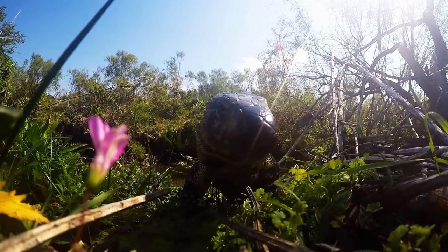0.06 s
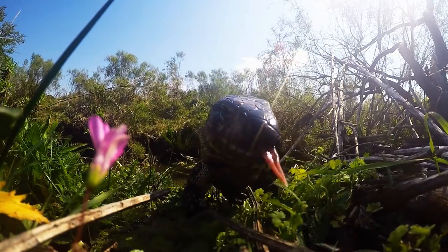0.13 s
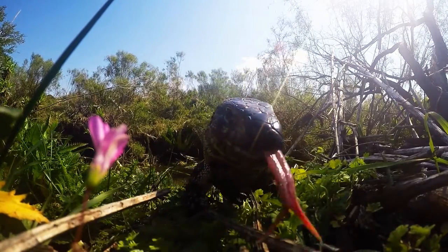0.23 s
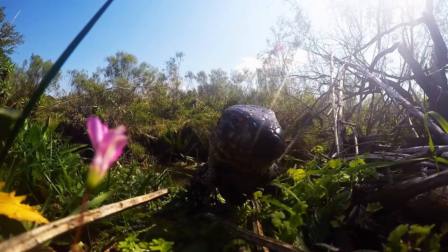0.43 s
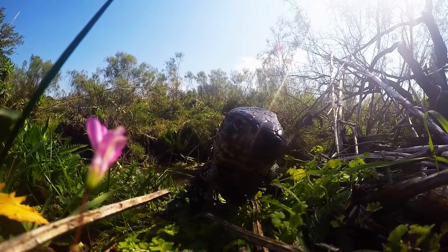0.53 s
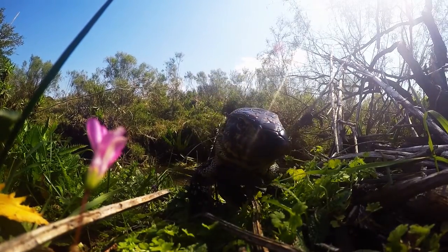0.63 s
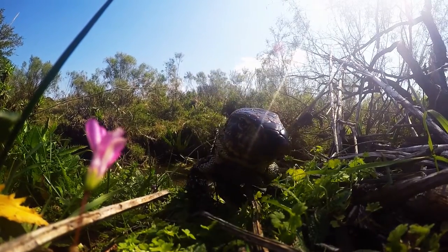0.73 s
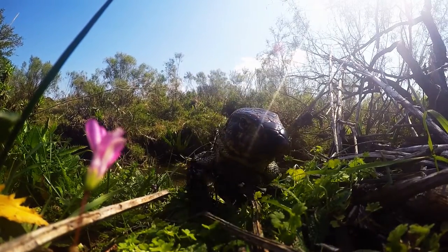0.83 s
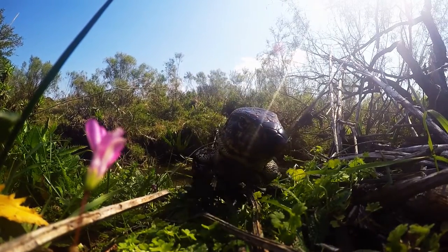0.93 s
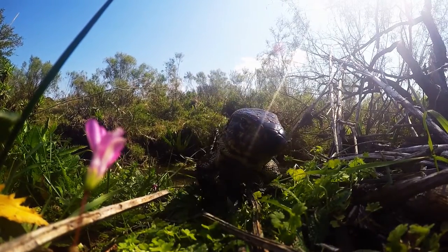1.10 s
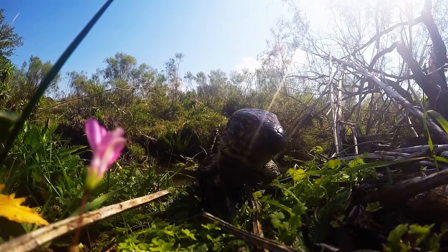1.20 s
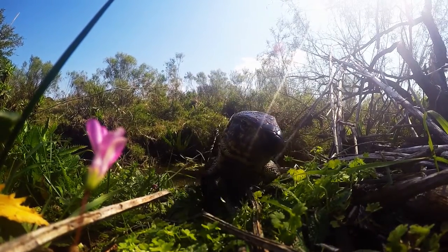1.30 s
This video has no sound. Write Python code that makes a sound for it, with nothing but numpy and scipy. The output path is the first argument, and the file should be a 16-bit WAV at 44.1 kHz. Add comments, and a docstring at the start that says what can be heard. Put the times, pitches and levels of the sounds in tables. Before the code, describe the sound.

Leaves rustle and stems tick as a lizard moves, with one sharp knock and low wind.

```python
"""Leaves rustle over a low rumble of wind and ground and a faint hiss of outdoor air.
A large lizard is shifting through low plants, right in front of a camera lying on the ground.
Dry blades scrape, feet thud softly, stems tick and ping, and one hard knock overloads the microphone.
The rustles, ticks and knock ring in the camera's case. Near the end, one distant bird whistles."""
import sys
import numpy as np
from scipy import signal
from scipy.fft import rfft, irfft, next_fast_len
from scipy.io import wavfile

SR = 44100
rng = np.random.default_rng(int(sys.argv[2]) if len(sys.argv) > 2 else 0)


def generate_wav(sig):
    """Save sig (samples, or channels by samples) to the path in sys.argv[1] as 16-bit PCM at SR."""
    pcm = np.round(np.clip(np.atleast_2d(sig).T, -1, 1) * 32767).astype(np.int16)
    wavfile.write(sys.argv[1], SR, pcm)


N = 59535  # 1.35 seconds


def amp(db):
    """Turn decibels into a gain."""
    return 10 ** (np.asarray(db) / 20)


def unit(x):
    """Scale x to an average (rms) level of 1."""
    return x / np.sqrt(np.mean(x ** 2) + 1e-20)


def along(points, hz):
    """Read between (Hz, value) points, with octaves evenly spaced."""
    pitches, values = np.transpose(points)
    return np.interp(np.log(hz + 1), np.log(pitches + 1), values)


def curves(rows):
    """Join timed rows into one curve for each column after the time."""
    times, *columns = np.transpose(rows)
    return [np.interp(np.arange(N) / SR, times, column) for column in columns]


def filtered(x, response):
    """Turn each frequency in x up or down by the gain response(hz)."""
    size = next_fast_len(N + SR // 2)
    return irfft(rfft(x, size) * response(np.fft.rfftfreq(size, 1 / SR)), size)[..., :N]


def noise(tone):
    """Noise of level 1, shaped by (Hz, dB) points."""
    return unit(filtered(rng.standard_normal(N + SR // 2), lambda hz: amp(along(tone, hz))))


def add(out, start, x):
    """Mix x into out from start, in seconds."""
    part = out[max(round(start * SR), 0):][:len(x)]
    part += x[:len(part)]


def friction(slips_per_s=700, smooth=0.9, spread_db=3.5):
    """Rubbing: tiny slips of uneven size over a smooth hiss."""
    slips = (rng.random(N) < slips_per_s / SR) * np.sign(rng.standard_normal(N))
    sizes = amp(spread_db * np.clip(rng.standard_normal(N), -2, 2))
    return unit(unit(slips * sizes) + smooth * rng.standard_normal(N))


def stroke(length, rise_s=0.0036, fall_s=0.0063):
    """The push of a brush or scrape: it rises, holds, then dies away."""
    t = np.arange(SR // 5) / SR
    return np.minimum(t / rise_s, 1) * np.exp(-np.maximum(t - length, 0) / fall_s)


# Where the case rings. Each row: pitch in Hz, width in Hz, level in dB.
CASE_RINGS = [(748, 129, -5.5), (969, 110, -3.5), (1130, 170, -2), (1511, 172, 2), (1713, 133, 7),
              (1907, 140, 3.5), (2278, 88, -4.5), (2767, 234, -6.5), (3267, 126, -3.5), (3560, 87.6, -6),
              (4392, 82, -3.5), (4404, 530, -10), (5710, 220, -12)]
# What gets through between those pitches. Each row: frequency in Hz, level in dB.
CASE_LEAK = [(60, -11), (600, -16.5), (2500, -14.5), (5000, -21.5), (7000, -24), (8000, -32), (9200, -37),
             (11000, -40), (12500, -35.5), (16000, -51.5)]
def case_ring(bass_db, treble_db, tone, size=4096):
    """The case rings after a touch: soft ones have more bass, dry ones more treble."""
    hz = np.fft.rfftfreq(size, 1 / SR)
    peaks = sum(amp(db) ** 2 / (1 + ((hz - pitch) / width) ** 2) ** 2 for pitch, width, db in CASE_RINGS)
    power = amp(along(CASE_LEAK, hz)) ** 2 + peaks
    balance = [(280, 0), (480, bass_db), (900, bass_db), (1450, 0), (2100, 0), (4500, treble_db)]
    colour = amp(along(tone, hz) + along(balance, hz))
    cepstrum = irfft(np.log(unit(np.sqrt(power)) * colour))
    # Fold it so that the ring comes after the touch, never before.
    cepstrum[1:size // 2] *= 2
    cepstrum[size // 2 + 1:] = 0
    return irfft(np.exp(rfft(cepstrum)))[:size // 2]


# The tone of the plants. Each row: frequency in Hz, boost in dB.
PLANT_TONE = [(300, 4), (1100, -0.5), (1750, -1), (2500, 1), (4400, -1.5), (9000, 1), (13000, -5),
              (16000, -5.5)]
# How much the plants stir. Each row: time in seconds, strength in dB.
STIR_LEVELS = [(0, -53.5), (.17, -52.5), (.45, -53), (.62, -54), (.8, -52.5), (.86, -63.5), (1.1, -70),
               (1.18, -58.5), (1.35, -59.5)]
def stirring_plants():
    """The plants keep rubbing, with slips so sparse that single crackles stand out."""
    stir_db, = curves(STIR_LEVELS)
    rubbing = amp(stir_db) * friction(slips_per_s=400, smooth=0.73)
    return signal.fftconvolve(rubbing, case_ring(bass_db=6, treble_db=2, tone=PLANT_TONE))[:N]


# The rumble's swells. Each row: time in seconds, strength of the deep and the upper band in dB.
RUMBLE_LEVELS = [(0.0, -45.5, -60), (0.036, -76, -31.5), (0.066, -38.5, -38.5), (0.172, -61, -42.5),
                 (0.258, -30, -30.5), (0.348, -36.5, -49), (0.442, -39.5, -38.5), (0.476, -20.5, -37),
                 (0.586, -39, -32.5), (0.646, -37, -44.5), (0.744, -28, -28), (0.792, -68, -32),
                 (0.818, -28.5, -66), (0.916, -42, -55), (1.224, -35.5, -46.5), (1.254, -27.5, -32),
                 (1.292, -39.5, -52), (1.35, -40, -42.5)]
# The tones of the two bands. Each row: frequency in Hz, boost in dB.
DEEP_TONE = [(10, -17.5), (24, 1), (42, 1), (60, -13.5), (90, -33.5), (300, -84.5), (1000, -120)]
UPPER_TONE = [(30, -3.5), (60, -1), (88, 1), (120, -6.5), (170, -12), (260, -21.5), (400, -27), (800, -37),
              (3000, -100)]
def rumble(trim_db=-2.5):
    """Wind and shaken ground rumble in two bands, mostly below and above 60 Hz."""
    deep_db, upper_db = curves(RUMBLE_LEVELS)
    return amp(deep_db + trim_db) * noise(DEEP_TONE) + amp(upper_db + trim_db) * noise(UPPER_TONE)


# The tone of the air. Each row: frequency in Hz, boost in dB.
AIR_TONE = [(80, 7.5), (200, 2), (450, -9.5), (650, -12.5), (900, 3), (1350, -16.5), (1850, -6),
            (2300, -12.5), (3500, -12), (7000, -19.5), (10000, -23.5), (15500, -25.5)]
def outdoor_air(db=-57):
    """The open air gives a faint, steady hiss."""
    return amp(db) * noise(AIR_TONE)


# Leaf strokes. Each row: start and length in seconds, then strength, bass and treble in dB.
LEAF_STROKES = [(0.017, 0.012, -42.5, 7, -4), (0.027, 0.023, -45, 4.5, -2), (0.063, 0.039, -39, -1, 1.5),
                (0.112, 0.026, -32.5, -11, 1.5), (0.138, 0.021, -49, -11, 3),
                (0.198, 0.024, -38.5, -2.5, 4), (0.235, 0.008, -32, 14, -3.5), (0.249, 0.022, -32, -2, 3.5),
                (0.274, 0.051, -40.5, 8, -0.5), (0.33, 0.066, -53, -8, 3.5), (0.417, 0.005, -34.5, 4, 9),
                (0.424, 0.051, -53, 10, 6.5), (0.719, 0.014, -38.5, 10, -2), (0.727, 0.033, -51, 17.5, -12),
                (0.793, 0.049, -56.5, 18.5, -28), (1.034, 0.017, -54, 10, 3),
                (1.122, 0.007, -58.5, 21, 9.5), (1.129, 0.011, -49, 13.5, 6.5),
                (1.148, 0.009, -38.5, -11, 0), (1.215, 0.061, -55.5, -30, 4)]
def brushing_leaves():
    """Leaves rub along the lizard's body, and the rubbing rings in the case."""
    out = np.zeros(N)
    for start, length, db, bass_db, treble_db in LEAF_STROKES:
        push = stroke(length)
        rubbing = push * friction()[:len(push)]
        add(out, start, amp(db) * signal.fftconvolve(rubbing, case_ring(bass_db, treble_db, PLANT_TONE)))
    return out


# Where a dry blade rings. Each row: pitch in Hz, width in Hz, level in dB.
BLADE_RINGS = [(4430, 110, 0), (6800, 350, -19)]
# Its scrapes. Each row: start in seconds, length in seconds, level in dB.
BLADE_SCRAPES = [(.017, 0.0076, -44), (0.029, 0.014, -45), (0.201, 0.013, -42.5)]
def scraping_blades():
    """Rubbing makes a dry blade ring with a thin squeak."""
    out = np.zeros(N)
    blade = lambda hz: sum(amp(db) / (1 + ((hz - pitch) / width) ** 2) for pitch, width, db in BLADE_RINGS)
    for start, length, db in BLADE_SCRAPES:
        push = stroke(length)
        squeak = unit(filtered(friction(), blade))[:len(push)]
        add(out, start, amp(db) * push * squeak)
    return out


# Footsteps. Each row: start in seconds, peak in dB, pitch in Hz, fade time in seconds.
FOOTSTEPS = [(0.035, -34.5, 131, 0.0051), (0.241, -33.5, 63.25, 0.16), (0.263, -23.5, 167.4, 0.0051),
             (0.42, -23.5, 55.6, 0.033), (0.558, -30.5, 72.2, 0.052), (0.668, -38, 307, 0.0037),
             (0.731, -28, 81.7, 0.04), (0.761, -25.5, 75, .022), (1.248, -36.5, 40.4, 0.036),
             (1.248, -29.5, 132, 0.0042)]
def footfalls(rise_s=0.0021):
    """Each step gives the soft ground a push, and it sways to rest."""
    out, t = np.zeros(N), np.arange(SR // 2) / SR
    for start, db, hz, fade in FOOTSTEPS:
        sway = (1 - np.exp(-t / rise_s)) * np.exp(-t / fade) * np.sin(2 * np.pi * hz * t)
        add(out, start, amp(db) * sway / np.abs(sway).max())
    return out


def contacts(rows, grit, tone, rise_s=0.00037):
    """A clean blow plus a short crunch, grit times as strong, rings the case."""
    out, t = np.zeros(N), np.arange(-SR // 500, SR // 20) / SR
    after = np.maximum(t, 0)
    window = 0.002 * SR  # a hit's level counts all its energy as falling within 2 ms
    for start, db, bass_db, treble_db, fade in rows:
        crunch = rng.standard_normal(len(t)) * (1 - np.exp(-after / rise_s)) * np.exp(-after / fade)
        spectrum = rfft(grit * crunch / np.linalg.norm(crunch) + (t == 0))
        force = irfft(spectrum / np.sqrt(np.abs(spectrum) + 1e-9))[:len(t) // 2]  # evens out the tone
        ring = case_ring(bass_db, treble_db, tone)
        hit = signal.fftconvolve(force, ring)
        gain = amp(db) * np.sqrt(window) * np.linalg.norm(ring)
        add(out, start + t[0], gain * hit / np.linalg.norm(hit))
    return out


# Ticks. Each row: start in seconds, then strength, bass and treble in dB, crunch fade in seconds.
STEM_TICKS = [(.0385, -27, 0, -17, 0.015), (.052, -36.5, 6, 5, 0.0025), (.075, -28, 8.5, 2.5, 0.0028),
              (.0975, -59, -12, 4, 0.0024), (.1232, -26.5, 0.5, 7.5, 0.0014), (.130, -32, -11, -5, 0.0015),
              (.2362, -28, 18, 7, 0.0004), (.252, -25.5, -10, -11, 0.0015), (.279, -34, 4, -14, 0.0015),
              (.291, -20, -8, -12.5, 0.0007), (.2983, -18, -10, -40, 0.0006), (.302, -20, -13, -27, 0.0028),
              (.311, -47, 12, 2, 0.0015), (.3175, -25.5, -7, -32, 0.0029), (.4195, -40.5, 15, 20, 0.0061),
              (.4835, -46.5, 13.5, 6.5, 0.0032), (.556, -27.5, -2.5, -3, 0.0011), (.571, -41, 0, 2, 0.0022),
              (.605, -55, 2, 21.5, 0.0045), (.625, -40, 11.5, -13, 0.00065),
              (.666, -26.5, -5, -1.5, 0.0023), (.709, -24.5, -7, 0, 0.002), (.764, -42.5, 4, 4, 0.0018),
              (.787, -51, 25, -10, 0.0012), (.796, -37.5, 8, -1, 0.002), (.809, -37.5, 16.5, -3.5, 0.0041),
              (.8255, -46, 20.5, 7, 0.00044), (.874, -47.5, 2.5, -18.5, .003), (.882, -48, 8.5, 0, 0.0028),
              (1.040, -46, 4, 11, 0.005), (1.1585, -35.5, 5, -2, 0.0024), (1.191, -52.5, 16, 0, 0.0031),
              (1.2165, -36.5, 3, 0.5, 0.012), (1.232, -36.5, -12, -6, .002), (1.244, -51, 25.5, -1, 0.0025),
              (1.314, -45.5, 7.5, 7.5, 0.0054)]
def ticking_stems():
    """Stems and twigs tick, with more crunch than clean blow."""
    return contacts(STEM_TICKS, grit=1.87, tone=PLANT_TONE)


# Pings. Each row: start in seconds, peak in dB, pitch in Hz, seconds to fade by 60 dB,
# and how far above its pitch the ping starts (0.06 means 6%).
STALK_PINGS = [(.075, -29.5, 963, 0.017, 0.06), (0.2365, -19.5, 476, 0.06, .6),
               (0.423, -34, 2684, 0.038, 0.028), (.6255, -33, 2540, 0.019, 0.046),
               (1.156, -44.5, 2525, 0.043, 0.025)]
def flicked_stalks(unbend_s=0.0025, jitter_radians=0.027):
    """A flicked stalk rings on one note, higher while it is still bent."""
    out, t = np.zeros(N), np.arange(SR // 10) / SR
    for start, db, hz, ring_s, bend in STALK_PINGS:
        pitch = hz * (1 + bend * np.exp(-t / unbend_s))
        phase = 2 * np.pi * np.cumsum(pitch) / SR
        phase += jitter_radians * np.cumsum(rng.standard_normal(len(t)))  # keeps the ring dry
        add(out, start, amp(db - 60 * t / ring_s) * np.sin(phase))
    return out


# Bursts of crackle. Each row: start in seconds, peak in dB.
CRACKLE_BURSTS = [(0.236, -42), (.2915, -42.5), (0.2987, -38), (0.3137, -38.5), (0.422, -36.5),
                  (0.461, -44.5), (0.899, -50.5), (1.323, -45)]
# Their crisp tone. Each row: frequency in Hz, boost in dB.
CRISP_TONE = [(2000, -44), (5000, -8), (6500, 3), (9000, -14.5), (14000, -13.5), (16000, -33.5)]
def bright_crackle(fade_s=0.0016):
    """Tiny bursts of bright crackle start sharply and die away at once."""
    out, t = np.zeros(N), np.arange(SR // 10) / SR
    for start, db in CRACKLE_BURSTS:
        burst = noise(CRISP_TONE)[:len(t)] * np.exp(-t / fade_s)
        add(out, start, amp(db) * burst / np.abs(burst).max())
    return out


# The knock's hits. Each row: start in seconds, strength, bass and treble in dB, crunch fade in seconds.
KNOCK_HITS = [(.2614, -3.5, -6.5, -26, 0.0013), (.2622, -11.5, 1, 12.5, 0.0009),
              (.2649, -8, 6.5, -8.5, 0.00021), (.2666, -18, -10.5, -5.5, 0.0013)]
# Their tone. Each row: frequency in Hz, boost in dB.
BLOW_TONE = [(300, -13), (850, -8), (1100, 2), (1750, -1.5), (2000, 2.5), (4400, -4.5), (5900, 5.5),
             (7000, 3.5), (9200, -5), (12000, 5), (16000, -23)]
def hard_knock():
    """One hard knock rings the case: a touch, a crack and two rebounds."""
    return contacts(KNOCK_HITS, grit=0.78, tone=BLOW_TONE)


def distant_bird(top_s=1.012, half_length_s=0.085, top_hz=3750, drop_hz=600, db=-68, blur_hz=130):
    """One whistle rises and falls, blurred by the bushes."""
    arch = np.clip((np.arange(N) / SR - top_s) / half_length_s, -1, 1)
    phase = 2 * np.pi * np.cumsum(top_hz - drop_hz * arch ** 2) / SR
    blur = filtered(rng.standard_normal((2, N)), lambda hz: np.exp(-(hz / blur_hz) ** 2))
    flutter, waver = 0.5 * unit(blur)
    whistle = (1 + flutter) * np.sin(phase) + waver * np.cos(phase)
    return amp(db) * np.sqrt(1 - arch ** 2) * whistle


def scene():
    """Mix the lizard's movements with the rumble, the air and the bird, in one channel."""
    bed = stirring_plants() + rumble() + outdoor_air()
    moving = brushing_leaves() + scraping_blades() + footfalls()
    snaps = ticking_stems() + flicked_stalks() + bright_crackle() + hard_knock()
    return (bed + moving + snaps + distant_bird())[None]


def record(dry, ceiling=0.9, edge_hz=11800, top_hz=15600):
    """The knock overloads the microphone, and the treble fades out from edge_hz to top_hz."""
    squashed = dry / (1 + np.abs(dry / ceiling) ** 6) ** (1 / 6)
    past_edge = lambda hz: np.clip((hz - edge_hz) / (top_hz - edge_hz), 0, 1)
    return filtered(squashed, lambda hz: np.cos(np.pi / 2 * past_edge(hz) ** 2))


dry = scene()
out = record(dry)
generate_wav(out)
```